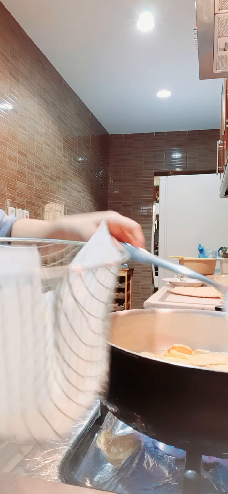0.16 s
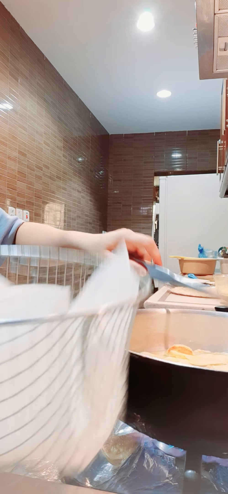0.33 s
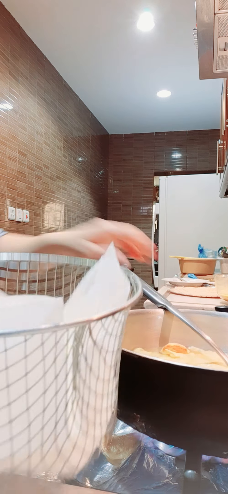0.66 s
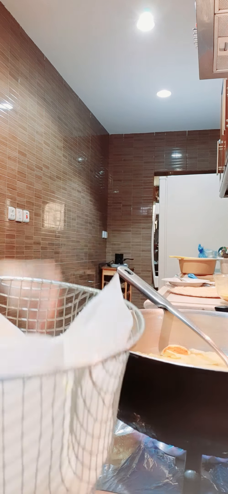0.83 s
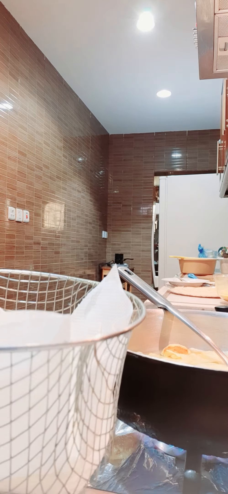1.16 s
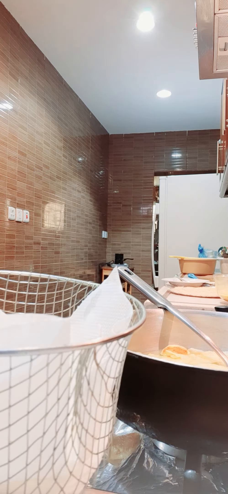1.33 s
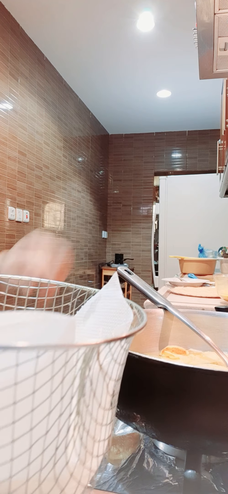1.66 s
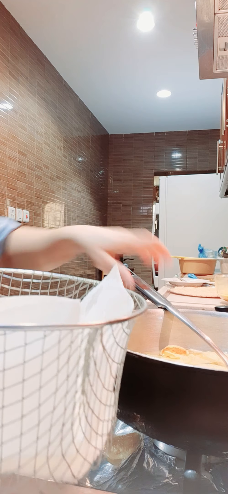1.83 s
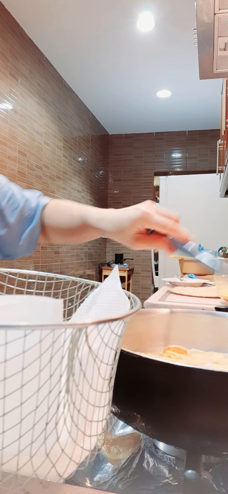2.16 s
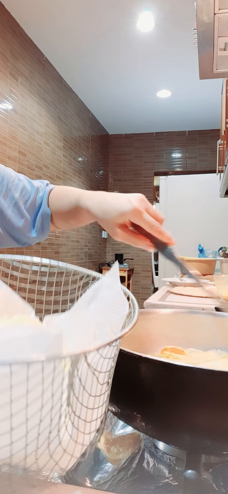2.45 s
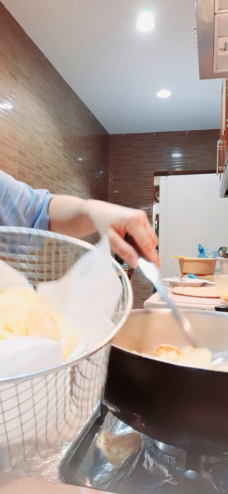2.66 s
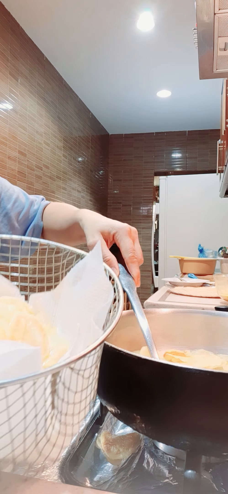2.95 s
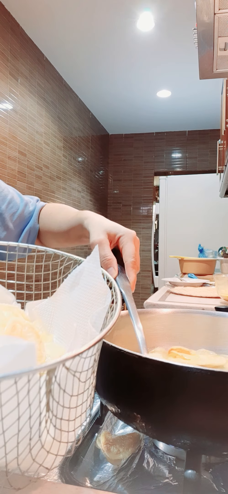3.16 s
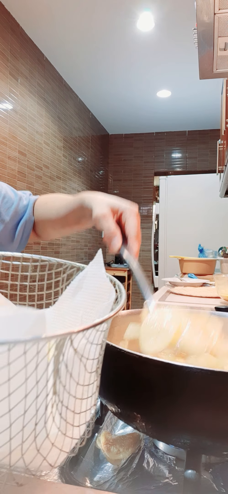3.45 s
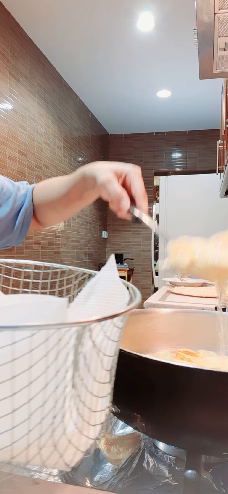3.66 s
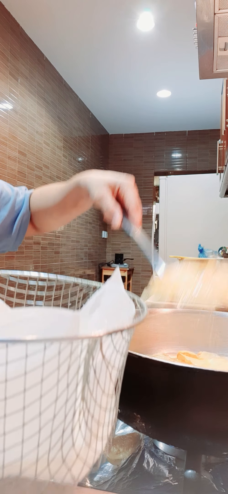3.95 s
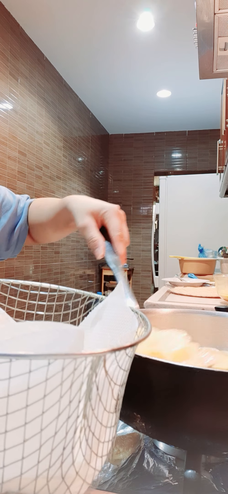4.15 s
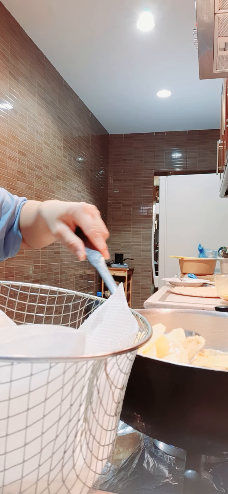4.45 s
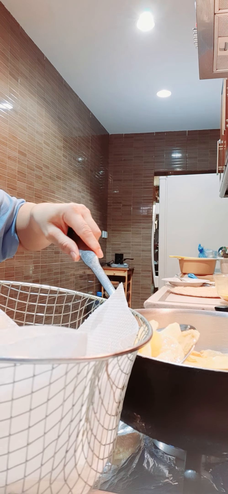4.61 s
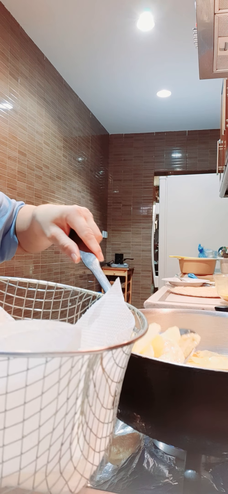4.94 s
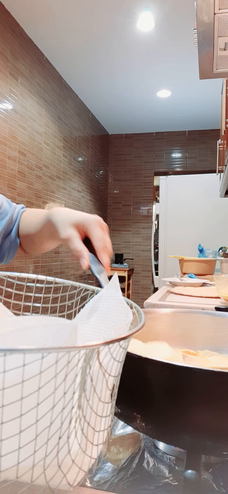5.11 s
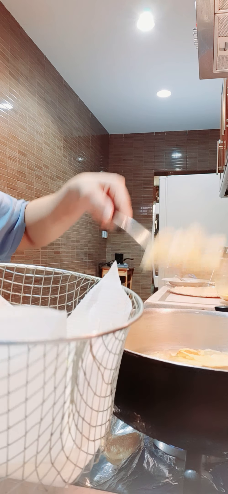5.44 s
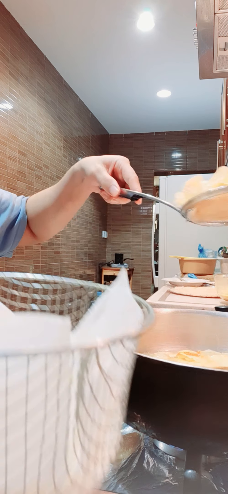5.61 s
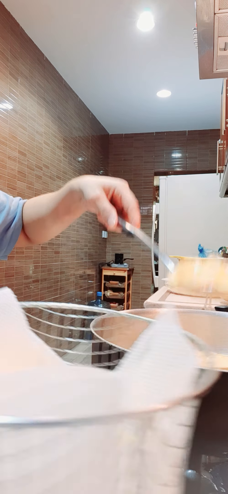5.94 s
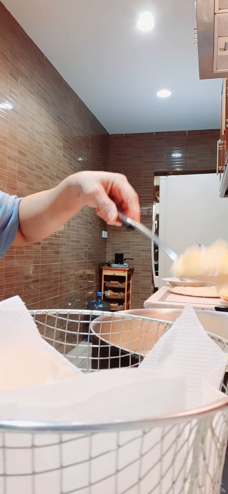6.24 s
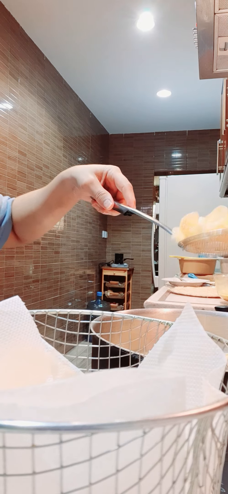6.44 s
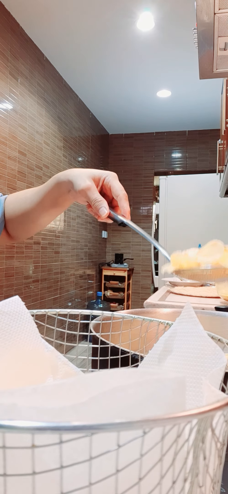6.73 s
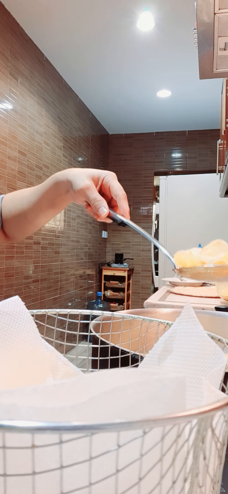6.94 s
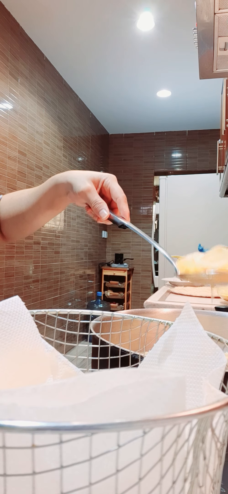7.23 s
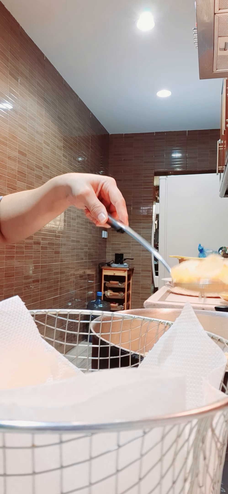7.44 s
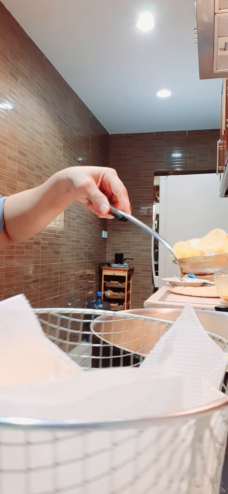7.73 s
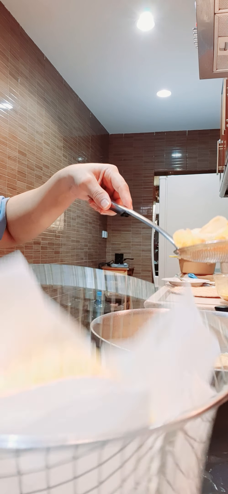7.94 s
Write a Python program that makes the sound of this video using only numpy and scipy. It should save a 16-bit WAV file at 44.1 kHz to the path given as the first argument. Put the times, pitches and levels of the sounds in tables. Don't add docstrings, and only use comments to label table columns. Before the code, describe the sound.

Close up in a small tiled kitchen, a wire basket rubs hollowly over foil as a steel skimmer clinks on a pan rim. Sharp knocks, short scrapes and crisp ticks follow, with a basket thud and shudder midway. After a quieter stretch of light scraping, heavy thuds arrive, then a last cluster of knocks. A low fan hum, airy rush and faint frying continue throughout. The microphones sit on the counter, feeling the thuds.

```python
import sys
import numpy as np
from scipy import signal
from scipy.io import wavfile

SR = 44100
rng = np.random.default_rng(int(sys.argv[2]) if len(sys.argv) > 2 else 0)


def log_audio(samples):
    frames = np.atleast_2d(samples).T
    limited = np.clip(frames, -1, 1)
    pcm = np.round(limited * 32767).astype(np.int16)
    wavfile.write(sys.argv[1], SR, pcm)


def linear_from_db(decibels):
    return 10 ** (np.asarray(decibels, float) / 20)


N = 355887

# t/s, peak level/dB, thin-wire
# level/dB rel, struck spot f/Hz
RIM_BLOWS = [
    (.278, -28.5, -13, 4460),
    (0.4365, -14, -6, 6440),
    (2.1757, -18.5, -11.5, 4770),
    (2.2978, -16.5, -3.5, 2600),
    (2.348, -20, -11, 5200),
    (2.3694, -19.5, -14, 6340),
    (3.5795, -29, -9, 5520),
    (4.1552, -11, -4.5, 6800),
    (5.736, -27, -11, 2200),
    (7.968, -20.5, -9, 5800),
]
# t/s, peak level/dB, thin-wire level/dB rel, favoured f/Hz
GRAZES = [(.318, -47, -26, 2520), (.341, -24.5, -5, 4540), (.405, -28, -19, 6500), (1.0545, -31, -20, 3000),
          (1.066, -33, -20, 4200), (2.2807, -26, -6, 3600), (2.873, -23, -9, 5000),
          (3.4535, -26, -24, 4400), (3.475, -29, -2, 5400), (3.5054, -26, 0.5, 5040),
          (3.6103, -28, -13, 6540), (3.642, -39, 2, 5960), (3.79, -25.5, -8, 5530), (3.845, -39, 7, 6500),
          (3.895, -40, 8, 6500), (4.135, -25, -21, 5030), (6.387, -28, -5, 5460), (6.8956, -29, -13, 2540)]
# f/Hz, level/dB, t60/s
STEEL_MODES = [(2100, -8, .02), (2450, -8, .02), (2750, -8, .02), (3558, -3, .065), (3604, -6, .04),
               (3890, -8, .04), (4432, -5, .03), (5030, -5, .055), (5095, -6, .035), (5550, -9, .03),
               (5914, -9, .05), (6230, -7, .03), (6710, -2, .025), (7100, -8, .03), (7456, -10, .03)]
# t/s, peak level/dB, left-right level/dB, favoured f/Hz
BOWL_BLOWS = [(.341, -24, -5, 1410), (.495, -23.5, -2, 474.6), (.52, -41, -4, 447.5), (1.058, -27, 7, 1070),
              (1.066, -23.5, -4, 1150), (2.1765, -17.5, -7, 900), (2.2987, -22, 1, 617),
              (2.371, -21.5, 0, 1190), (3.385, -31.5, -2, 600), (3.484, -32, -5, 1100),
              (3.5075, -38, -17, 1200), (3.58, -28.5, -4, 680), (4.1565, -16, 3, 1290),
              (4.167, -25, -4, 700), (5.737, -25, -3, 1490), (6.601, -42, -7, 480), (7.9697, -19, 2, 1093)]
# f/Hz, level/dB, t60/s
BOWL_MODES = [(365, -5, .07), (454, -3, .09), (520, -5, .06), (636, -1, .08), (748, 1, .07), (815, -1, .06),
              (1000, -6, .035), (1110, -2, .05), (1250, -2, .04), (1515, -1, .04), (1760, -1, .035)]
# t/s, peak level/dB, f/Hz, t60/s
PINGS = [(0.4374, -18.5, 6650, 0.017), (0.4372, -19, 4450, 0.015), (.4375, -28, 5900, 0.02),
         (.4371, -31, 3300, 0.022), (.4371, -32, 2440, .03), (.47, -39, 4400, 0.043),
         (1.056, -38, 2340, .04), (1.056, -40, 3490, .04), (2.298, -28.5, 5260, 0.046),
         (2.298, -26, 3890, .04), (2.298, -28, 2580, 0.065), (2.3487, -24, 6400, 0.023),
         (2.3487, -28, 4500, .03), (2.349, -24, 1140, 0.036), (2.371, -22, 1120, 0.056),
         (2.1765, -23, 1100, 0.06), (2.1765, -31, 3600, 0.036), (2.6, -38, 5250, 0.036),
         (2.2, -40, 5250, .04), (2.395, -29, 1300, .05), (2.539, -30, 1160, .04), (2.37, -28, 6660, .025),
         (2.3697, -34, 5070, 0.037), (2.4214, -27.5, 1810, 0.084), (2.5182, -32, 1700, .06),
         (4.1555, -24, 5040, 0.059), (4.1555, -34, 5090, .2), (4.156, -17, 6640, .025),
         (4.1555, -19.5, 4440, .04), (4.1555, -25, 3565, 0.097), (4.156, -29, 6234, .1),
         (4.156, -36, 7095, 0.16), (4.1555, -35, 7456, 0.18), (4.1555, -27, 2150, .04),
         (4.1555, -30, 2720, 0.052), (4.1553, -34.5, 3025, 0.089), (6.386, -37, 5600, 0.017),
         (7.3433, -35, 2100, 0.026), (7.968, -32, 2900, 0.023), (7.968, -24, 1100, .03)]
# t/s, peak level/dB, f/Hz, t60/s
MORE_PINGS = [(2.1762, -27, 6700, .03), (2.1762, -33, 5930, .09), (2.1762, -29.5, 5130, .03),
              (2.176, -27, 4350, .03), (2.1765, -29, 2410, 0.047), (2.1765, -32, 1800, .04),
              (2.18, -23, 765, .06), (2.177, -26.5, 452, 0.075), (2.298, -31, 2060, .04),
              (2.298, -33, 3180, .04), (2.298, -33, 6720, .03), (2.301, -25.5, 620, .09),
              (2.3487, -33, 5100, .03), (2.3487, -32, 3880, .03), (4.1555, -27, 6470, .05),
              (4.1555, -33, 5570, .05), (4.1555, -30, 2240, .06), (7.968, -35, 4400, .03),
              (7.968, -32, 6680, .03), (7.968, -33, 3520, .025), (7.968, -35, 2100, .04),
              (.318, -30, 1720, .05), (.378, -34, 2500, .04), (.405, -35, 2450, .04),
              (.45, -36, 6300, .1), (3.455, -39, 2620, 0.037), (3.5065, -28, 1050, .02)]
# t/s, peak level/dB, f/Hz, t60/s
LOW_PINGS = [(.496, -26, 442, .07), (.506, -24, 492, .06), (.518, -24, 550, 0.049), (.545, -35, 500, .06),
             (.574, -34, 490, .06), (2.5505, -16, 418, .07), (2.5497, -24, 720, 0.057),
             (2.5497, -26, 830, .04), (2.575, -24.5, 410, 0.21), (2.607, -26.5, 407, .16),
             (2.655, -35, 450, .1), (2.8, -33, 395, .1), (2.857, -30, 413, .15), (2.864, -29, 410, 0.17),
             (4.157, -25.5, 635, 0.15), (4.16, -28, 815, 0.094), (4.166, -27, 670, .1),
             (4.157, -35, 455, 0.084), (4.19, -30, 1125, .15), (5.738, -7.5, 253, .04),
             (5.738, -21.5, 151, 0.14), (5.7416, -18.5, 423, .08), (5.74, -23, 600, 0.052),
             (5.748, -17, 111, .15), (5.79, -32, 412, .2), (5.7545, -16.5, 174, 0.065),
             (6.09, -29.5, 620, .04), (6.6, -32, 440, 0.038)]
# start t/s, hold t/s, level/dB, bright part level/dB rel
STROKES = [(0.354, 0.11, -37, -12), (0.228, 0.049, -61, -1), (0.747, 1.2, -61, -2.5), (2.33, 0.18, -36, -8),
           (2.793, 0.084, -35.5, -9.5), (2.577, 0.14, -46, -15), (3.045, 0.33, -49, -3.5),
           (3.407, 0.51, -50.5, -2), (4.202, 0.046, -40.5, -4), (4.458, 1.15, -53.5, -5),
           (8.043, .05, -46, -9)]
# start t/s, hold t/s, level/dB
DRAG = [
    (2.39, .15, -41.5),
]
# f/Hz, width f/Hz, level/dB
DRAG_PEAKS = [(1230, 240, 1), (3800, 220, -9), (1850, 100, -1), (2670, 170, -7)]
# t/s, peak level/dB, f/Hz, t60/s
TICKS = [(3.757, -35, 6860, 0.031), (3.809, -30.5, 3250, 0.022), (3.822, -21, 6700, 0.028),
         (3.835, -44, 6600, 0.05), (3.86, -48, 6300, 0.04), (4.394, -37.5, 5640, 0.032),
         (4.466, -44, 6010, .015), (4.612, -39, 5560, 0.014), (4.647, -45, 6060, .02),
         (4.762, -40, 5700, 0.021), (6.438, -38, 6000, 0.06), (6.896, -39, 2650, 0.084),
         (6.98, -37, 2540, .03), (7.343, -32.5, 2030, 0.04), (7.352, -42, 4000, 0.034),
         (7.576, -39, 7000, 0.017), (7.795, -49, 6000, 0.022)]
# t/s, peak level/dB, knock level/dB rel, left-right level/dB, favoured f/Hz
THUDS = [(.496, -22, -8, -2, 500), (0.507, -36, -8, -8, 500), (.519, -37, -4, -2, 520),
         (0.532, -40, -13, -6, 500), (2.55, -19, -5, -13, 330), (2.561, -15, -24, -6, 130),
         (2.601, -25, -17, -7, 300), (2.622, -25, -12, -12, 231), (2.644, -24.5, -10, -13, 222),
         (2.861, -35, 0, -12, 420), (5.7366, -13.5, -5, -13, 332), (5.745, -18.5, -11, -19, 400),
         (5.754, -18, -16, -4, 380), (5.78, -17, -24, -9, 203), (5.811, -27, -13, -4, 199),
         (5.884, -28, -21, -11, 219), (5.953, -22, -15.5, -12, 258), (6.059, -23, -15, -13, 395),
         (6.091, -25, -12, -16, 440), (6.103, -21, -31, -11, 270), (6.125, -25, -32, -9, 215),
         (7.911, -25.5, -8, -10, 324), (7.934, -17, -9, -7, 278), (7.97, -17, -7, -4, 398),
         (7.977, -23, -16, -8, 330), (7.989, -24, -7, 0, 400), (8.004, -17.5, -18, -3, 270),
         (8.021, -27.5, -1.5, -4, 350), (8.044, -30.5, -1, -2, 405)]
# f/Hz, level/dB, t60/s
COUNTER_MODES = [(115, 0, .12), (172, -9, .11), (222, -2, .09), (290, 0, .05), (350, -6, .05),
                 (411, -2, .13), (450, -7, .06), (506, -7, .05)]
# start t/s, hold t/s, level/dB
SHUDDER = [
    (.5, 0.02, -44),
    (2.58, 0.16, -36),
    (2.78, 0.07, -40),
    (5.76, .01, -46),
    (5.955, 0.0093, -42),
    (6.08, .03, -56),
    (7.97, 0.05, -54),
]
# start t/s, hold t/s, level/dB
SLIDE = [
    (0, .62, -42),
    (.68, .31, -41),
    (1.075, .095, -42),
]
# f/Hz, width f/Hz, level/dB
SLIDE_PEAKS = [(1405, 165, 0), (1150, 400, -1.5), (13300, 1600, -22)]
# t/s, pitch factor [1]
SLIDE_PITCH = [(0, 0.96), (.1, 0.99), (.45, 0.94), (.75, 0.99), (.8, 0.95), (.92, 1), (1.06, .94),
               (1.16, 1.02), (2, 1.05)]
# t/s, level/dB
HUM = [(0.0, -32.5), (0.04, -33.5), (0.65, -30), (1.37, -37.5), (2.18, -27.5), (3.84, -36), (4.14, -29.5),
       (5.06, -35), (5.21, -30), (5.64, -35.5), (5.77, -23.5), (5.82, -29.5), (6.2, -40), (6.38, -33),
       (7.37, -31.5), (7.84, -38), (7.98, -26.5), (8.07, -42)]
# f/Hz, wander width f/Hz, rms level/dB, left-right level/dB
MOTOR = [(61.9, 10.25, -56, 17), (157.3, 0.79, -55.5, -2), (173, 6.32, -57.5, -2), (208.2, 0.21, -42, 1.3),
         (301.6, 3.32, -55, 0.5), (338.2, 3.91, -57, -3), (429.3, 11.24, -57, 1.5)]
# f/Hz, level/dB per Hz
AIR = [(25, -21), (45, -44), (70, -20), (130, -3.5), (250, -12), (400, -12), (800, -14), (1500, -12),
       (2300, -27.5), (3500, -32), (6800, -31.5), (8300, -53), (10500, -38), (14000, -37.5)]
# f/Hz, correlation [-1..1]
LIKENESS = [(60, 0.67), (130, -0.19), (290, 1), (640, 0.93), (1410, -0.62), (3100, 0.17), (6820, -0.045),
            (15000, -0.089)]
# f/Hz, left-right level/dB
LEAN = [(60, 0), (180, 7), (550, -4), (1650, -2.5), (4970, -2.5), (15000, -0.5)]


def skimmer():
    touches = [(s, db, edge, -13, hz, .022) for s, db, edge, hz in RIM_BLOWS]
    touches += [(s, db, edge, -2, hz, .036) for s, db, edge, hz in GRAZES]
    s, blow_db, edge_db, left_db, spot_hz, rasp_t60 = np.transpose(sorted(touches))
    rim = strike(s, blow_db - 19, left_db, STEEL_MODES, spot_hz, spot_db=10, spread_db=2.5)
    tilt_db = 3.5 * np.log2(spot_hz / 4200)
    dull = band(crack(s, blow_db - tilt_db + 0.5, left_db, rasp_t60), 1050, 2870, order=3)
    bright = band(crack(s, blow_db + tilt_db - 0.5, left_db, rasp_t60), 3580, 7360, order=4)
    fizz = band(crack(s, blow_db + edge_db - 3.0, left_db - 2, 1.35 * rasp_t60), 9600, 16000)

    s, blow_db, left_db, spot_hz = np.transpose(BOWL_BLOWS)
    bowl = strike(s, blow_db - 7, left_db, BOWL_MODES, spot_hz, spot_db=18.0, spread_db=1.5)
    clank = band(crack(s, blow_db + 0.4 * np.log2(spot_hz / 2000), left_db, t60=.08), 640, 3000)
    return bowl, rim + pings(), dull + bright + fizz + clank


def pings():
    out, t = np.zeros((2, N + 6000)), np.arange(6000) / SR
    for s, ping_db, hz, t60 in [*PINGS, *MORE_PINGS, *LOW_PINGS]:
        i = round(s * SR)
        tone = linear_from_db(ping_db - 60 * t / max(t60, .01)) * np.sin(2 * np.pi * hz * t)
        out[:, i:i + 6000] += tone * sides(-10.5)[:, None]
    return band(out[:, :N], 75, 20000)


def scrape():
    fry_db, fry_bright_db = -52.5, -19
    strokes = swells(STROKES, rise_db_s=95, fall_db_s=124)
    dull = linear_from_db(fry_db) + strokes.sum(axis=0)
    bright = linear_from_db(fry_db + fry_bright_db) + linear_from_db(np.array(STROKES)[:, 3]) @ strokes
    sizes = linear_from_db(2.7 * np.minimum(rng.exponential(1, (2, N)), 5)) * rng.choice([-1, 1], (2, N))
    present = rng.random((2, N)) < 5000 / SR
    grains = sizes * present * linear_from_db(2.24 * drift(25))
    pan = rms_one(band(grains, 436, 2625))
    steel = rms_one(band(grains, 1730, 6750, order=4))
    steel = steel + linear_from_db(-7.0) * rms_one(band(grains, 11600, 15500))
    return linear_from_db(-2.0) * dull * pan + linear_from_db(-3.0) * bright * steel


def drag():
    end = 3 * SR
    start_pitch, sag_per_s, edge_db_s = 1.02, .7, 900
    pitch = start_pitch - sag_per_s * (np.arange(end) / SR - DRAG[0][0])
    turns = 2 * np.pi * np.cumsum(np.clip(pitch, .5, 2)) / SR
    noise = rng.standard_normal((len(DRAG_PEAKS), end))
    song = np.zeros(end)
    for n, (hz, width_hz, peak_db) in zip(noise, DRAG_PEAKS):
        song += linear_from_db(peak_db) * rms_one(band(n, 14.0, width_hz)) * np.sin(hz * turns)
    return swells(DRAG, edge_db_s, edge_db_s)[0] * linear_from_db(4.1 * drift(40)) * np.pad(song, (0, N - end))


def ticks():
    out, t = np.zeros((2, N)), np.arange(3000) / SR
    for s, tick_db, hz, t60 in TICKS:
        i = round(s * SR)
        puff = rng.standard_normal(3000) * linear_from_db(-60 * t / max(t60, .005))
        puff = band(puff, hz - 450, hz + 450)
        out[:, i:i + 3000] += linear_from_db(tick_db - 0.5) * puff / np.abs(puff).max()
    return out


def basket():
    s, blow_db, knock_db, left_db, spot_hz = np.transpose(THUDS)
    low = strike(s, blow_db - 7, left_db, COUNTER_MODES, spot_hz, spot_db=7.0, spread_db=.8)
    rattle = band(crack(s, blow_db + knock_db + 16.0, .5 * left_db, t60=0.08), 500, 1180)
    rub = rng.standard_normal(N) * swells(SHUDDER, rise_db_s=396, fall_db_s=187).sum(axis=0)
    shudder = np.zeros(N)
    for hz, mode_db, t60 in COUNTER_MODES[1:]:
        gain = linear_from_db(mode_db + 29.5 - 14 * np.log2(hz / 411) ** 2)
        shudder += gain * t60 ** .5 * resonance(rub, hz, 2.25 / t60)
    return band(low, 90, 505, order=3) + rattle + shudder * sides(-2.3)[:, None]


def slide():
    end = 2 * SR
    noise = rng.standard_normal((2, end)) * linear_from_db(1.6 * drift(30)[:end])
    hollow = np.zeros((2, end))
    for hz, width_hz, peak_db in SLIDE_PEAKS:
        twice = resonance(resonance(noise, hz, width_hz), hz, 2 * width_hz)
        hollow += linear_from_db(peak_db) * rms_one(twice)
    read = np.cumsum(in_time(SLIDE_PITCH)[0][:end])
    hollow = np.array([np.interp(read, np.arange(end), side) for side in hollow])
    pushes = swells(SLIDE, rise_db_s=150, fall_db_s=300).sum(axis=0)
    return pushes * np.pad(hollow, [(0, 0), (0, N - end)])


def kitchen(x):
    t60_s, shared_hz, wall_cut_hz = 0.34, 900, 17200
    t = np.arange(int(.6 * SR)) / SR
    noise = rng.standard_normal((3, len(t)))
    tail = band(noise[:2], shared_hz, wall_cut_hz, order=1) + band(noise[2], 383, shared_hz)
    tail = tail * linear_from_db(-60 * t / t60_s) * np.clip(t / 0.0065, 0, 1)
    tail = tail / np.sqrt(np.sum(tail ** 2, axis=1, keepdims=True))
    return signal.fftconvolve(x.mean(axis=0, keepdims=True), tail, axes=1)[:, :N]


def fan():
    level_db, = in_time(HUM)
    hum_hz, swing_hz, swing_s, fastest_s, wander_hz = 99.4, 1.0, 6.1, 6.5, 0.4
    speed = hum_hz + swing_hz * np.cos(2 * np.pi * (np.arange(N) / SR - fastest_s) / swing_s)
    phase = 2 * np.pi * np.cumsum(speed + wander_hz * drift(1.7)) / SR
    hum = np.sqrt(2) * linear_from_db(level_db + 1.53 * drift(10.8)) * np.sin(phase - np.array([[.05], [0]]))
    out = hum * sides(6.5)[:, None]
    for hz, width_hz, tone_db, left_db in MOTOR:
        turn = 2 * np.pi * np.cumsum(hz + width_hz * drift(5.45)) / SR
        out += np.sqrt(2) * linear_from_db(tone_db + 1.16 * drift(1.5)) * np.sin(turn) * sides(left_db)[:, None]

    air, edges = 0, 22 * 2 ** (np.arange(30) / 3)
    white, together = rng.standard_normal((2, 2, N)), drift(24.0)
    for k, (low, high) in enumerate(zip(edges, edges[1:])):
        mid, side = band(white[k % 2], low, high)
        hz = np.sqrt(low * high)
        alike = np.clip(at_hz(LIKENESS, hz), -.95, .98)
        gain = linear_from_db(at_hz(AIR, hz) + .5 * together + 0.17 * drift(23.0)) * sides(at_hz(LEAN, hz))[:, None]
        air = air + gain * (np.sqrt(1 + alike) * mid + np.sqrt(1 - alike) * side * [[1], [-1]])
    return out + linear_from_db(-41.5) * rms_one(air)


def strike(times, blow_db, left_db, modes, spot_hz, spot_db, spread_db):
    at, out = np.round(times * SR).astype(int), np.zeros((2, N))
    chance = rng.standard_normal((len(at), len(modes), 4))
    for k, (hz, mode_db, t60) in enumerate(modes):
        clicks = np.full((2, N), 1e-18)
        uneven_db = spread_db * (chance[:, k, 0] + 1.5 * chance[:, k, 1:3].T)
        ears = linear_from_db(uneven_db) * np.sign(chance[:, k, 3])
        mode_level_db = blow_db + mode_db - spot_db * np.log2(hz / spot_hz) ** 2
        clicks[:, at] = linear_from_db(mode_level_db) * sides(left_db) * ears
        r, w = linear_from_db(-60 / (t60 * SR)), 2 * np.pi * hz / SR
        out += signal.lfilter([0, np.sin(w)], [1, -2 * r * np.cos(w), r * r], clicks)
    return out


def crack(times, blow_db, left_db, t60):
    env, t = np.zeros((2, N + 9000)), np.arange(9000) / SR
    port_gains = (linear_from_db(blow_db) * sides(left_db)).T
    for s, gains, fade in zip(times, port_gains, np.broadcast_to(t60, times.shape)):
        i = round(s * SR)
        env[:, i:i + 9000] += gains[:, None] * linear_from_db(-60 * t / max(fade, .005))
    noise = rng.standard_normal((3, N))
    return env[:, :N] * (0.36 * noise[0] + 0.56 * noise[1:])


def swells(rows, rise_db_s, fall_db_s):
    t, (start, hold, level_db) = np.arange(N) / SR, np.array(rows).T[:3, :, None]
    rise_db = rise_db_s * np.maximum(start - t, 0)
    fall_db = fall_db_s * np.maximum(t - start - hold, 0)
    return linear_from_db(level_db - rise_db - fall_db)


def resonance(x, hz, width_hz):
    r = np.exp(-np.pi * width_hz / SR)
    poles = [1, -2 * r * np.cos(2 * np.pi * hz / SR), r * r]
    return signal.lfilter(np.array([1, 0, -1]) * (1 - r * r) / 2, poles, x)


def band(x, low_hz, high_hz, order=2):
    sos = signal.butter(order, [low_hz, min(high_hz, .45 * SR)], "band", fs=SR, output="sos")
    return signal.sosfilt(sos, x)


def drift(rate):
    r = np.exp(-80 * np.pi * rate / SR)
    slow = signal.lfilter([1], [1, -2 * r, r * r], rng.standard_normal(N // 40 + 2002))[2000:]
    return np.interp(np.arange(N) / 40, np.arange(len(slow)), rms_one(slow - slow.mean()))


def in_time(rows):
    s, *columns = np.transpose(rows)
    return [np.interp(np.arange(N) / SR, s, c, -150, -150) for c in columns]


def at_hz(points, hz):
    point_hz, values = np.array(points).T
    return np.interp(np.log(hz), np.log(point_hz), values)


def sides(left_db):
    return np.array([linear_from_db(left_db / 2), linear_from_db(-left_db / 2)])


def rms_one(x):
    return x / np.sqrt(np.mean(x ** 2) + 1e-20)


def scene():
    bowl, rim, rasp = skimmer()
    rub = scrape() + drag() + ticks() + slide()
    thuds = basket()
    direct = rim + rasp + rub
    direct[1] = np.roll(direct[1], 17)
    to_room = linear_from_db(-12) * (bowl + rim) + linear_from_db(-0.5) * rasp + linear_from_db(-2) * rub + linear_from_db(-5.5) * thuds
    return direct + bowl + thuds + linear_from_db(0.5) * kitchen(to_room) + fan()


def band_limit(x):
    return signal.sosfilt(signal.butter(12, 15750, fs=SR, output="sos"), x)


def record(dry):
    heard = signal.sosfilt(signal.butter(2, 35, "high", fs=SR, output="sos"), dry)
    mix = np.clip(heard, -.98, .98)
    return band_limit(mix)


dry = scene()
out = record(dry)
log_audio(out)
```